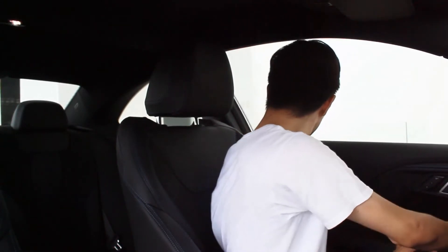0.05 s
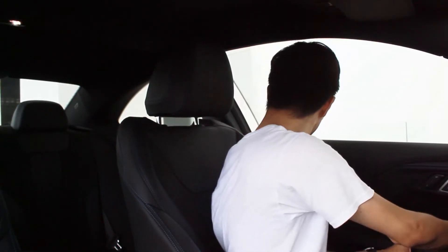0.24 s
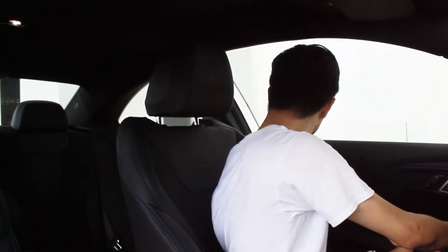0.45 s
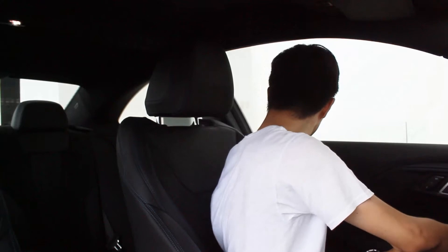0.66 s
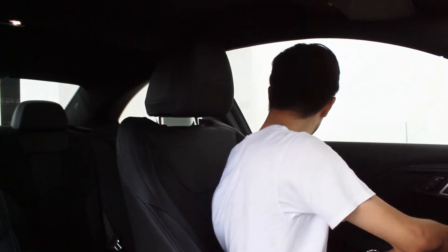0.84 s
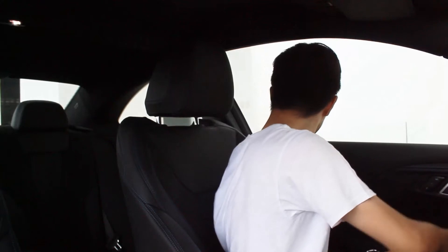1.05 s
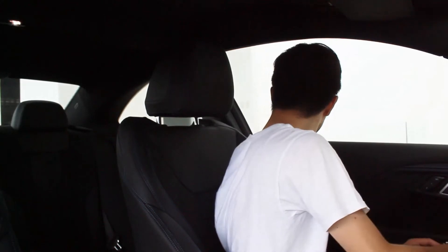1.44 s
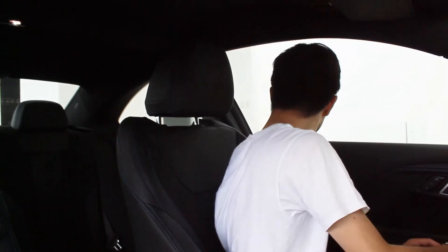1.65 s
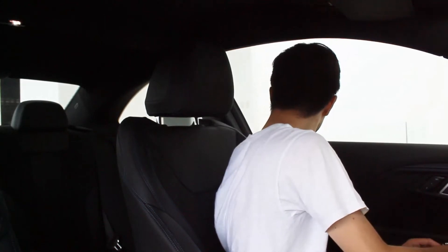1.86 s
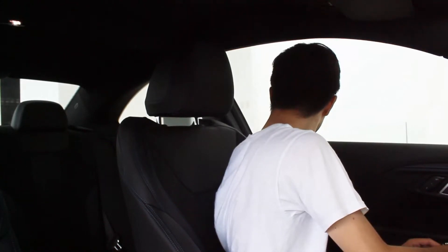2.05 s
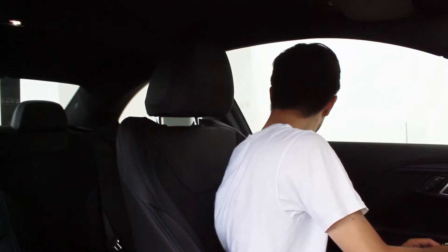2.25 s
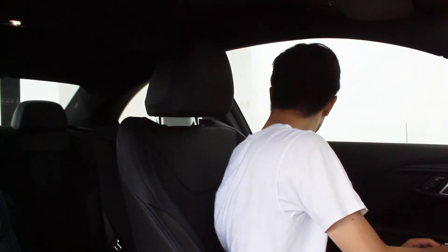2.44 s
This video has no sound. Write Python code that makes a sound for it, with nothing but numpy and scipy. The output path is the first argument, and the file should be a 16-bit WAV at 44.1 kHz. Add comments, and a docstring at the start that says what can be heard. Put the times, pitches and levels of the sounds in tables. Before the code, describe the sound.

The sound is heard from inside a car parked in a large hall, over a quiet, steady rumble and hiss of ventilation. Two soft knocks on the trim come right at the start, and faint, thin, high whines come and go until about 0.5 seconds. At about 0.75 seconds the door is pulled shut: the latch clatters quickly, the rubber seal gives a tiny squeak, and at 0.85 seconds the door seats with one loud, thick, booming thud topped by a bright tick. It all reads as a single slam. The body shudders briefly and the hall echoes faintly, while the air noise dips and swells back. Around 1.1 seconds there is a soft double knock with a brush of cloth. A sleeve rubs faintly again near 1.3 seconds and from about 2.0 to 2.3 seconds, over the ventilation.

```python
"""A car door is pulled shut, heard from inside the cabin, with the car standing in a large hall.
The latch clatters over the striker, each impact exciting the door's modes; the rubber seal squeaks,
the door seats, the cabin air booms and the body shudders. The hall reverberates faintly.
Behind it are steady ventilation, thin whines, soft knocks and a sleeve brushing the trim.
The slam overloads the recorder with a tick; its gain ducks and then lets the air noise swell back."""
import sys
import numpy as np
from scipy import signal
from scipy.fft import rfft, irfft
from scipy.io import wavfile
from scipy.ndimage import minimum_filter1d

SR = 44100
rng = np.random.default_rng(int(sys.argv[2]) if len(sys.argv) > 2 else 0)


def unload_audio(sound):
    """Save the sound as a 16-bit wav file, at the path given as the first command line argument."""
    columns = np.transpose(np.atleast_2d(sound))
    # keep every value between -1 and 1, then stretch to whole-number steps
    steps = np.round(np.clip(columns, -1, 1) * 32767)
    wavfile.write(sys.argv[1], SR, steps.astype(np.int16))


N = 110250
TIME, HZ = np.arange(N) / SR, np.fft.rfftfreq(N, 1 / SR)
CHATTER_S = 0.7433  # the latch starts over the striker


def amp(db):
    """Amplitude ratio of a level in decibels."""
    return 10 ** (np.asarray(db) / 20)


def unit(x):
    """Normalisation to rms 1."""
    return x / np.sqrt(np.mean(x ** 2) + 1e-20)


def read(points, hz):
    """Interpolation of a table on a logarithmic frequency axis."""
    f, value = np.transpose(points)
    return np.interp(np.log(hz + 1), np.log(f + 1), value)


def add(mix, s, sound):
    """Superposition: a sound joins the mix at time s."""
    part = mix[max(round(s * SR), 0):][:len(sound)]
    part += sound[:len(part)]


def lag(x, tau_s):
    """First-order relaxation toward x with time constant tau_s."""
    pole = np.exp(-1 / (tau_s * SR))
    return signal.lfilter([1 - pole], [1, -pole], x)


def rise(tau_s, size=N):
    """Exponential approach from 0 to 1."""
    return 1 - np.exp(-TIME[:size] / tau_s)


def arch(start, end):
    """Envelope of one swell: the square root of a half sine."""
    return np.sin(np.pi * np.clip((TIME - start) / (end - start), 0, 1)).clip(0) ** .5


def coloured_noise(gain):
    """Spectral shaping of white noise, brought to rms 1."""
    return unit(irfft(rfft(rng.standard_normal(N)) * gain, N))


def ring(modes, pitch=1):
    """Free vibration: a sum of exponentially damped modes."""
    t = TIME[:SR]
    return sum(amp(db - 60 * t / t60) * np.sin(2 * np.pi * hz * pitch * t) for hz, db, t60 in modes)


def impact_spectrum(hz, tilt_db, weight_db, panel_hz=650):
    """Excitation by an impact: hard ones tilt toward the treble, heavy ones drive the low panel modes."""
    octaves = np.log2((hz + 50) / 1000)
    return amp(tilt_db * octaves + weight_db / (1 + (hz / panel_hz) ** 4))


def dying_noise(spectrum, decay, size, tilt_db=0, weight_db=0):
    """Modal overlap: countless close modes merge into noise that decays band by band."""
    hz, t, bands = signal.stft(rng.standard_normal(size), SR, nperseg=512)
    colour = unit(amp(read(spectrum, hz))) * impact_spectrum(hz, tilt_db, weight_db)
    envelope = amp(-60 * t / read(decay, hz)[:, None])
    return signal.istft(bands * colour[:, None] * envelope, SR, nperseg=512)[1][:size]


# Spectrum of ventilation and rumble: f/Hz, relative level/dB
AIR_SPECTRUM = [(15, -6.5), (42, 2.5), (65, -6), (98, -3.5), (135, -14), (210, -10.5), (370, -25.5),
                (520, -23.5), (850, -29), (1250, -27.5), (1900, -34), (3200, -35), (7000, -45.5),
                (15500, -46.5)]
# Likeness of that noise at the two ears: f/Hz, coherence
AIR_COHERENCE = [(20, 1), (250, 1), (500, 0.9944), (1500, 1), (3000, 0.9784), (5500, 0.707), (8500, 0.227),
                 (12000, 0.0095), (16000, 0)]

def air(level_db=-31, rumble_hz=70, open_rumble_db=3, open_hiss_db=1.1429, seal_s=0.083):
    """Sound insulation: partly coherent air noise drops as the seal shuts out the share from outside."""
    shared, apart = rfft(rng.standard_normal((2, N)))
    coherence = np.clip(read(AIR_COHERENCE, HZ), 0, 1)
    ears = shared * np.sqrt(1 + coherence) + np.array([[1], [-1]]) * apart * np.sqrt(1 - coherence)
    noise = amp(level_db) * unit(irfft(ears * amp(read(AIR_SPECTRUM, HZ)), N))
    rumble = irfft(rfft(noise) / (1 + (HZ / rumble_hz) ** 4), N)
    hiss = noise - rumble
    door_open = np.clip(1 - (TIME - CHATTER_S) / seal_s, 0, 1)
    return rumble * amp(open_rumble_db * door_open) + hiss * amp(open_hiss_db * door_open)


# Thin whines in the air noise: start t/s, end t/s, f/Hz, level/dB
WHINES = [(0.106, 0.178, 4800, -55.5), (0.16, 0.42, 4840, -61), (0.356, 0.52, 7990, -65.5),
          (0.42, 0.502, 5950, -63)]

def whines(width_hz=75):
    """Narrow-band noise is heard as pitch: faint tones that come and go."""
    out = np.zeros(N)
    for start, end, hz, db in WHINES:
        band = np.exp(-((HZ - hz) / width_hz) ** 2)
        out += amp(db) * arch(start, end) * coloured_noise(band)
    return out


# Spectrum of rubbing cloth: f/Hz, relative level/dB
CLOTH_SPECTRUM = [(300, -6), (1400, 5), (2500, 2), (5500, -5.5), (7000, -8.5), (15000, -15.5)]
# Strokes of the arm: start t/s, end t/s, level/dB
SLEEVE_STROKES = [(1.111, 1.175, -44), (1.266, 1.44, -52), (2.043, 2.29, -53.5)]

def sleeve():
    """Friction noise: cloth hisses while it slides over the seat and trim."""
    hiss = coloured_noise(amp(read(CLOTH_SPECTRUM, HZ)))
    return hiss * sum(amp(db) * arch(start, end) for start, end, db in SLEEVE_STROKES)


# Modes of the door trim: f/Hz, relative level/dB, T60/s
TRIM_MODES = [(307.7, -3, 0.134), (388.3, 0, 0.0864), (464.9, 3.5, 0.119), (579, -25, 0.08)]
# Touches on the trim: t/s, level/dB, factor on the mode frequencies
TRIM_KNOCKS = [(0.028, -25, 0.551), (0.061, -33.5, 0.75), (1.1303, -19, 1), (1.1505, -25.5, 0.99)]

def knocks(rise_s=0.00288):
    """Soft impacts excite the trim's damped modes with a dull onset."""
    out = np.zeros(N)
    for s, db, pitch in TRIM_KNOCKS:
        add(out, s, amp(db) * ring(TRIM_MODES, pitch) * rise(rise_s, SR))
    return out


# Spectrum of the hall's tail through the glass: f/Hz, relative level/dB
HALL_SPECTRUM = [(60, 7), (200, 7.5), (400, 7), (490, 9), (800, -4), (1200, -3), (1600, -1), (1850, -8.5),
                 (2300, -5.5), (2850, -7), (4000, -15), (6000, -29), (14000, -40.5)]
# Reverberation time of the hall: f/Hz, T60/s
HALL_T60 = [(60, 0.82), (300, 1.225), (1400, 2.155), (5000, 1.723)]

def hall(level_db=-17.5, build_s=0.0411):
    """Reverberation: the slam's diffuse field builds up, seeps into the cabin and decays."""
    out = np.zeros(N)
    tail = dying_noise(HALL_SPECTRUM, HALL_T60, N)
    add(out, CHATTER_S, amp(level_db) * tail * rise(build_s) ** 3)
    return out


# Peaks that colour the air noise and the hall's tail: f/Hz, width/Hz, gain/dB
RESONANCES = [(1211.3, 80, 5.5), (1471.3, 55, 6.5), (2795, 74, 1.5)]

def resonate(x):
    """Resonance lifts a few narrow bands out of a noise."""
    lift_db = sum(db / (1 + (2 * (HZ - hz) / width) ** 2) for hz, width, db in RESONANCES)
    return irfft(rfft(x) * amp(lift_db), N)


def overload_tick(at_s=0.8476, impulse_db=1, corner_hz=3300):
    """Overload: one bright click, a filtered impulse placed where the thud overloads the recorder."""
    out = np.zeros(N)
    click = lag(signal.unit_impulse(SR // 100), 1 / (2 * np.pi * corner_hz))
    high_pass = signal.butter(4, corner_hz, "high", fs=SR, output="sos")
    add(out, at_s, amp(impulse_db) * signal.sosfilt(high_pass, click))
    return out


# Spectrum of the shuddering body: f/Hz, relative level/dB
BODY_SPECTRUM = [(15, -2.5), (40, 0), (75, 2), (110, -6.5), (170, -8), (300, -13), (450, -30.5), (900, -44),
                 (4000, -79.5)]
# Decay time of the body: f/Hz, T60/s
BODY_T60 = [(30, 0.82), (100, 0.594), (300, 0.836), (1000, 0.22)]

def shudder(seated_s=0.8318, level_db=-4, build_s=0.0102):
    """Structure-borne sound: panels and suspension rumble on unevenly after the door seats."""
    out = np.zeros(N)
    add(out, seated_s, amp(level_db) * dying_noise(BODY_SPECTRUM, BODY_T60, N) * rise(build_s))
    return out


# Slow swing of the cabin air as the seal closes: t/s, level/dB, f/Hz, T60/s
CABIN_SWING = (0.7585, 2.41, 27.5, 0.362)
# Modes of the cabin air: f/Hz, relative level/dB, T60/s
CABIN_MODES = [(39.44, -5.5, 0.73), (71.68, -15.5, 0.275)]
# The door seats, then the body rocks back twice: t/s, level/dB, pulse duration/s
THUDS = [(0.8318, 9, 0.0215), (1.015, -13, 0.0202), (1.233, -21.5, 0.0228)]

def boom(rise_s=0.00066):
    """Cavity resonance: the trapped air swings, and each thud's pressure pulse leaves it ringing."""
    out = np.zeros(N)
    s, db, hz, t60 = CABIN_SWING
    add(out, s, -ring([(hz, db, t60)]))
    ringing = lag(ring(CABIN_MODES), rise_s)
    for s, db, duration_s in THUDS:
        phase = np.pi * np.minimum(TIME[:SR] / duration_s, 1)
        push_and_rebound = np.sin(2 * phase) * np.sin(phase) ** .5
        add(out, s, amp(db) * (push_and_rebound + ringing))
    return out


# Glide of the squeezed seal: start t/s, end t/s, first f/Hz, last f/Hz, level/dB
SEAL_GLIDE = (0.8268, 0.835, 1800, 1100, -12)

def squeak(roughness=0.15, jitter_s=0.0003976):
    """Friction of rubber slipping on the door frame gives a very short, rough, falling tone."""
    start, end, first_hz, last_hz, db = SEAL_GLIDE
    jitter = unit(lag(rng.standard_normal(N), jitter_s))
    hz = np.interp(TIME, [start, end], [first_hz, last_hz]) * (1 + roughness * jitter)
    return amp(db) * arch(start, end) * np.sin(2 * np.pi * np.cumsum(hz) / SR)


def chatter(count=6, gap_s=0.0047, first_db=-0.5, fade_db=-2.5, bite_db=2.2, weight_db=1.2):
    """Periodic impacts of latch on striker, as rows like LATCH_BLOWS, weakening toward the end."""
    step = np.arange(count)
    progress = step / (count - 1)
    db = first_db + fade_db * progress ** 2
    tilt_db = -1 + bite_db * np.sin(np.pi * progress ** 1.3)  # brightest just past the middle
    return np.column_stack([CHATTER_S + gap_s * step, db, tilt_db, np.full(count, weight_db)])


# First touch, seal, catch, seating, lock settling: t/s, level/dB, tilt/(dB/octave), panel weight/dB
LATCH_BLOWS = [(0.7406, -11.5, -3.5, -2.5), (0.8160, -5.5, -6, -12), (0.8280, -2.5, -10.5, -19),
               (0.843, -9, -5.5, -11), (0.8740, -3, -2.5, -8)]
# Spectrum of the small parts' rattle: f/Hz, relative level/dB
RATTLE_SPECTRUM = [(100, -5.5), (250, -6.5), (700, 0.5), (1100, -9), (1500, -11), (2200, -9.5),
                   (3000, -11.5), (4800, -15.5), (6000, -27.5), (9000, -37.5), (15000, -54)]
# Decay time of the rattle: f/Hz, T60/s
RATTLE_T60 = [(100, 0.517), (400, 0.097), (1500, 0.0593), (4000, 0.0496), (12000, 0.0403)]
# Modes of the door: f/Hz, relative level/dB, T60/s
DOOR_MODES = [(165.98, -12.5, 0.468), (236.9, 2, 0.0486), (261.1, -6.5, 0.045), (302.3, -5.5, 0.1005),
              (359.6, -23, 0.042), (448.5, -11.5, 0.062), (587, -38, 0.0374), (659.5, -4, 0.0336),
              (718, -16.5, 0.06), (972.3, -18, 0.038), (1090, -23.5, 0.0457), (1297.3, -16.5, 0.08),
              (1392.8, -12.5, 0.051), (1479.7, -15, 0.0366), (1743.7, -19, 0.0755), (1818.5, -30.5, 0.05),
              (2099.6, -21.5, 0.049), (2700.3, -18.5, 0.079), (2879, -24.5, 0.11), (3150, -30, 0.038),
              (3540, -24, 0.0415), (3628, -23.5, 0.0454), (4042, -21, 0.05), (4300, -28.5, 0.038)]

def latch(rattle_db=-12.5, door_db=-5.5, rise_s=0.00054):
    """Impact excitation: each blow rattles small parts and feeds energy to the door's damped modes."""
    out, t = np.zeros(N), TIME[:SR // 2]
    blows = np.vstack([chatter(), LATCH_BLOWS])
    for s, db, tilt_db, weight_db in blows:
        rattle = dying_noise(RATTLE_SPECTRUM, RATTLE_T60, SR // 4, tilt_db, weight_db)
        add(out, s, amp(db + rattle_db) * rattle * rise(rise_s, len(rattle)))
    times, blow_db, tilt_db, weight_db = blows.T
    onsets = np.round((times - times.min()) * SR).astype(int)
    for hz, db, t60 in DOOR_MODES:
        drive = amp(blow_db) * impact_spectrum(hz, tilt_db, weight_db)
        energy_in = np.bincount(onsets, drive ** 2, len(t))
        retained = amp(-60 / (t60 * SR)) ** 2  # share of the energy left after one sample
        energy = signal.lfilter([1], [1, -retained], energy_in)
        envelope = lag(np.sqrt(energy), rise_s)
        add(out, times.min(), amp(db + door_db) * envelope * np.sin(2 * np.pi * hz * t))
    return out


def scene():
    """Superposition: the door and all other sources sit in the middle of the stereo air noise."""
    ambience = resonate(air() + hall())
    door = latch() + boom() + shudder()
    return ambience + door + overload_tick() + knocks() + whines() + sleeve() + squeak()


def record(dry, threshold_db=-8, sense_s=0.00655, attack_s=0.0123, hold_s=0.0643,
           recovery_db_per_s=42, edge_hz=15850):
    """Automatic gain control ducks fast, holds and recovers slowly; saturation and a low-pass follow."""
    power = lag((dry ** 2).mean(0), sense_s)
    over_db = np.maximum(10 * np.log10(power + 1e-12) - threshold_db, 0)
    half_hold = int(hold_s * SR / 2)
    held_db = -minimum_filter1d(-over_db, 2 * half_hold + 1, origin=half_hold, mode="nearest")
    recovery_db = TIME * recovery_db_per_s
    reduction_db = np.maximum.accumulate(held_db + recovery_db) - recovery_db
    ducked = dry * amp(-lag(reduction_db, attack_s))
    saturated = ducked / (1 + ducked ** 6) ** (1 / 6)
    low_pass = signal.firwin(511, edge_hz, window=("kaiser", 9), fs=SR)
    return signal.oaconvolve(saturated, low_pass[None], "same")


dry = scene()
out = record(dry)
unload_audio(out)
```